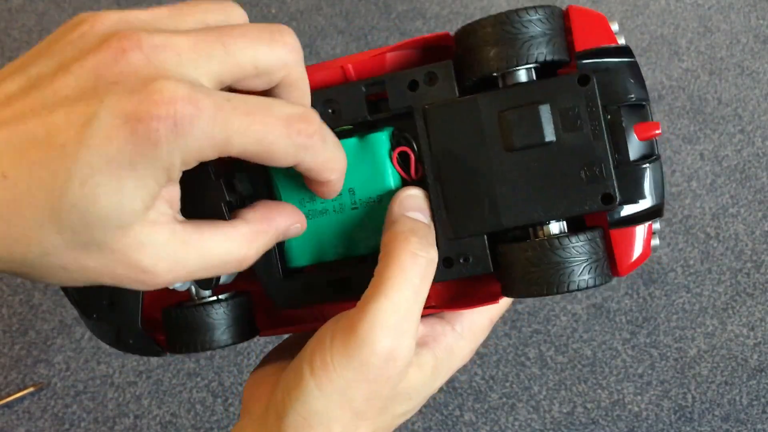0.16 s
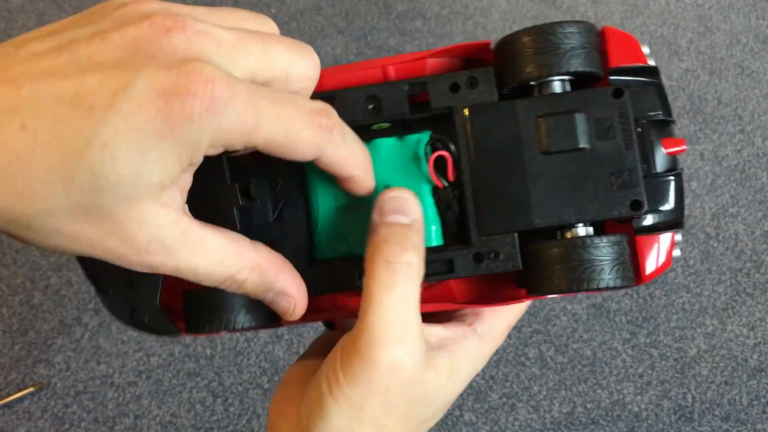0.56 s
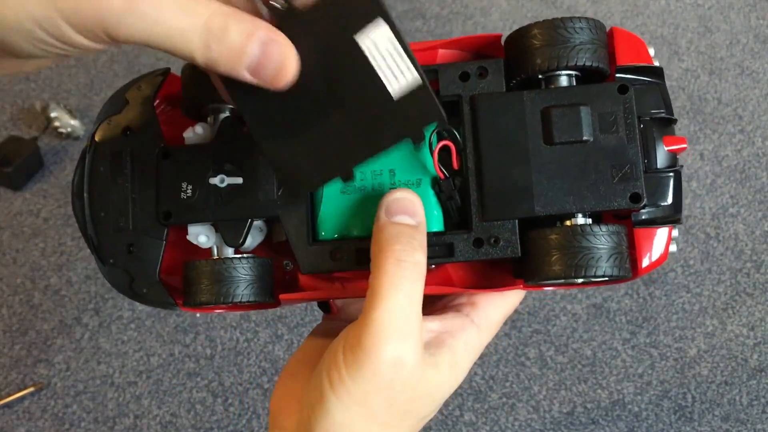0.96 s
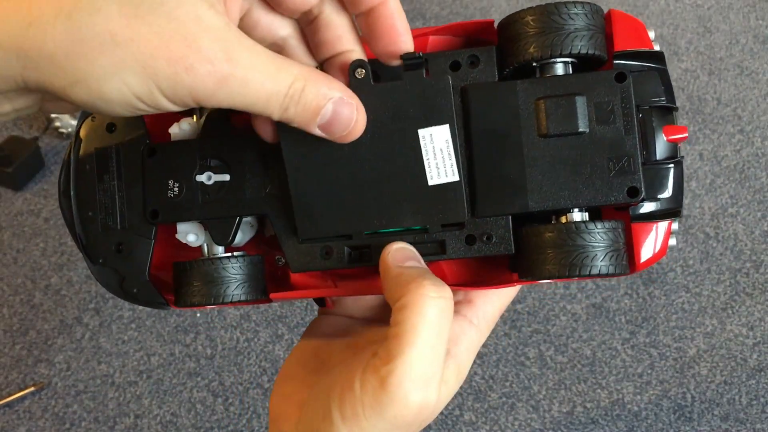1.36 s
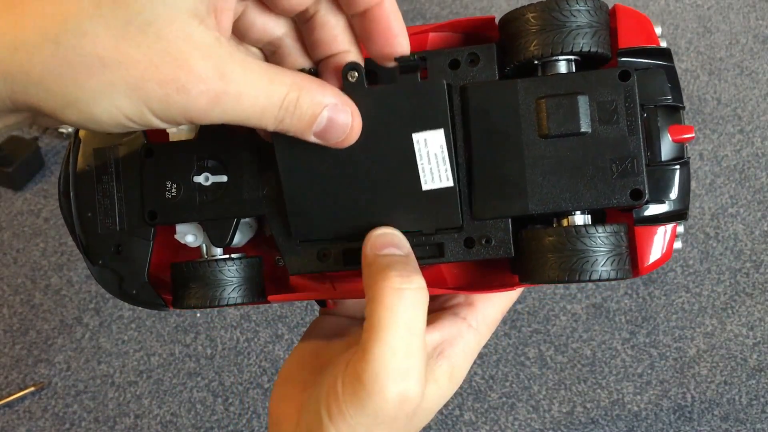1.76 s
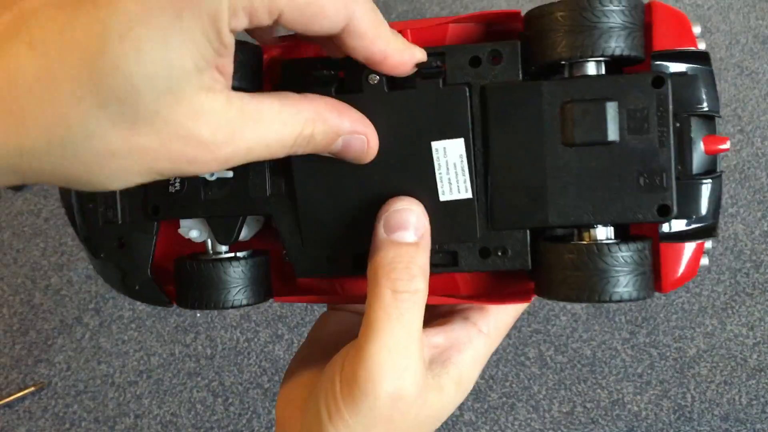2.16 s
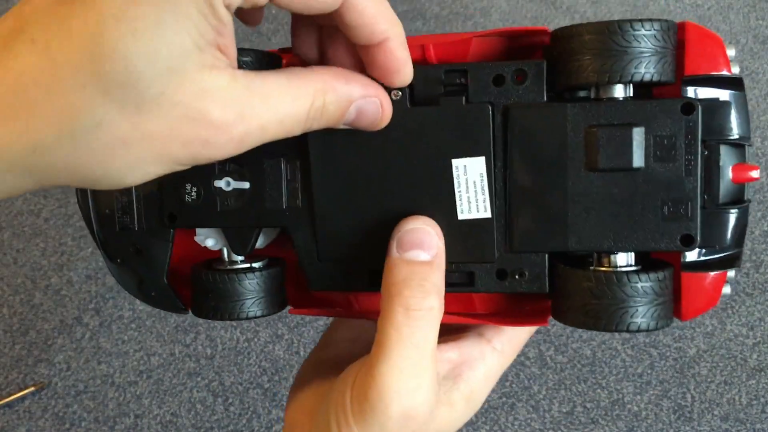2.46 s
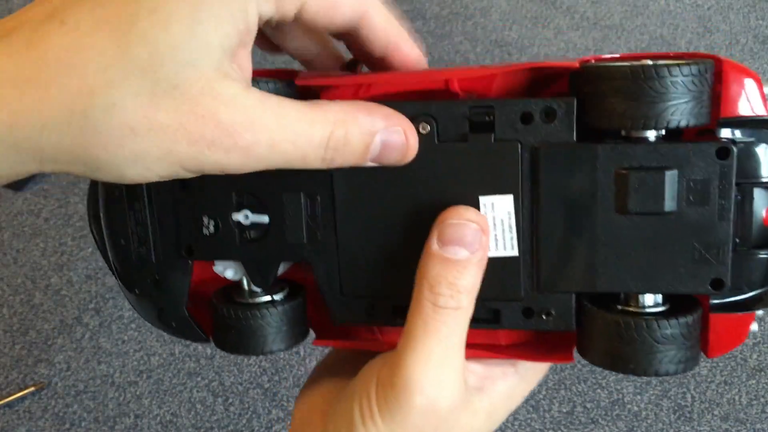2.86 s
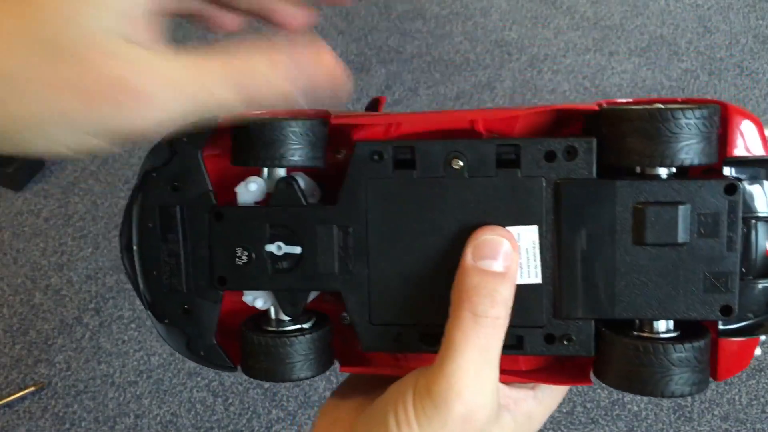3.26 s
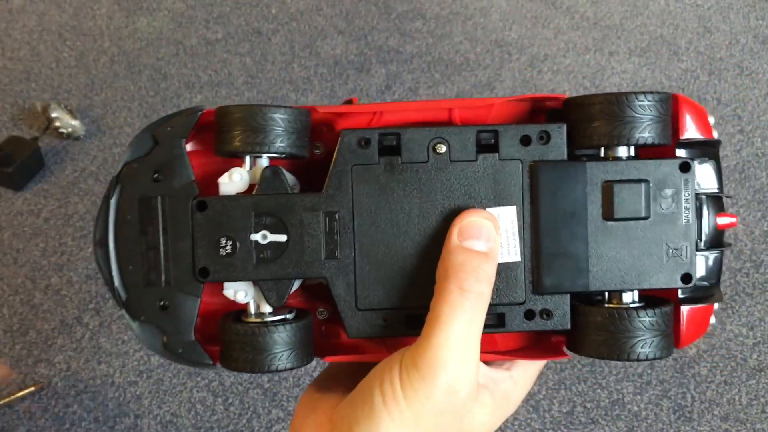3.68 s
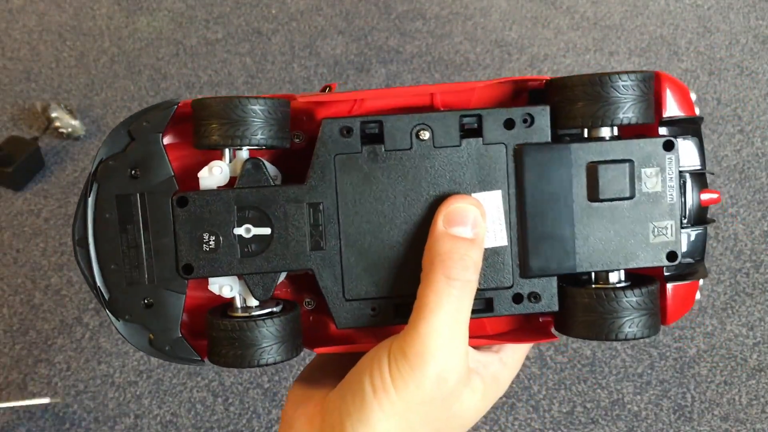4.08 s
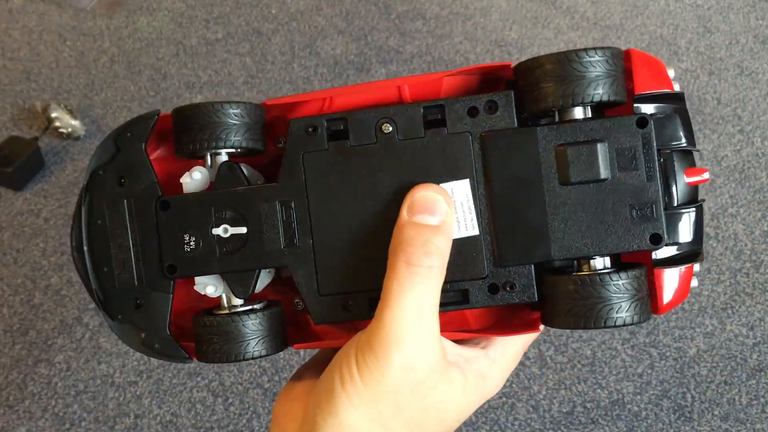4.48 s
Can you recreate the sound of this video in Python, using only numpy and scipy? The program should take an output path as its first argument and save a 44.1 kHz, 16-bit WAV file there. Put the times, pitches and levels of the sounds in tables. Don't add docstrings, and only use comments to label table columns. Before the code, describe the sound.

Close phone recording in a small carpeted room with a short, faint tail. It opens with gritty finger rubbing on plastic and light ticks; at 0.23 s a very loud, sharp snap rings the hollow toy car as the battery pack seats. Firm clacks follow at 0.37-0.57 s, then smaller ticks and knocks, with a bright hard crack near 1.08 s. Sparse contacts come at 1.3 s and 1.55-1.9 s as the cover is positioned. Rubbing returns around 2.1 s, and a quick cluster of scrapes and rattling clacks runs 2.6-2.8 s. At 3.08 s a second snap, crisp and bright, closes the cover. After that only faint brushes and tiny ticks remain, around 3.6-4.0 s and near 4.5 s. Beneath, low rumble is strongest at the start and fades, soft hiss persists, and a distant engine drone swells faintly around 1-1.8 s and 3.6-4.6 s.

```python
import sys
import numpy as np
from scipy import signal
from scipy.fft import rfft, irfft, next_fast_len
from scipy.io import wavfile
from scipy.ndimage import uniform_filter1d, map_coordinates

SR = 44100
rng = np.random.default_rng(int(sys.argv[2]) if len(sys.argv) > 2 else 0)


def digitize_waveform(pressure):
    field = np.atleast_2d(pressure).T
    bounded = np.clip(field, -1, 1)
    quanta = np.round(bounded * 32767).astype(np.int16)
    wavfile.write(sys.argv[1], SR, quanta)


def how_loud(loudness_db):
    steps = np.asarray(loudness_db, float) / 20
    return 10 ** steps


N = 204022


def unit(x):
    return x / np.sqrt(np.mean(x ** 2) + 1e-20)


def along(points, hz):
    f, v = np.transpose(points)
    return np.interp(np.log(hz + 1), np.log(f + 1), v)


def curves(rows):
    s, *cols = np.transpose(rows)
    return [np.interp(np.arange(N) / SR, s, c) for c in cols]


def wobble(rate_hz):
    knots = rng.standard_normal(int(N * rate_hz / SR) + 4)
    return map_coordinates(knots, [np.arange(N) * rate_hz / SR])


def filtered(x, response):
    m = next_fast_len(N + SR // 2)
    return irfft(rfft(x, m) * response(np.fft.rfftfreq(m, 1 / SR)), m)[:N]


def rung(force, modes):
    def response(f):
        total = 0
        for k, (centre_hz, width_hz, db) in enumerate(modes):
            damping = 1j * f * width_hz
            total = total + (-1) ** k * how_loud(db) * damping / (centre_hz ** 2 - f * f + damping)
        return total

    power = np.mean(np.abs(response(np.linspace(0, SR / 2, 4096))) ** 2)
    return filtered(force, response) / np.sqrt(power)


def body(force):
    # centre in Hz, width in Hz, level in dB.
    box_modes = [(221, 630, -18.5), (348, 140, -4.5), (611, 19, -5), (701.5, 33, -3), (840, 97, 2.5),
                 (1024, 140, 3.5), (1360, 270, -4.5)]
    panel_modes = [(1600, 230, -3.5), (2110, 340, -1), (2560, 450, 0), (3345, 450, -4), (3590, 130, 0),
                   (4400, 1100, -7)]
    edge_modes = [(5497, 680, -3), (6800, 970, -3), (7440, 800, -2), (9330, 1500, -2.5), (10010, 780, -1),
                  (10960, 1400, -4.5), (12495, 1600, -4), (14830, 710, -5)]
    box, panels, edges = (rung(f[:N], modes) for f, modes in zip(force, (box_modes, panel_modes, edge_modes)))
    return filtered(box + panels, lambda hz: 1 / (1 + 1.3j * hz / 5600 - (hz / 5600) ** 2)) + edges


def air():
    # frequency in Hz, density in dB per Hz.
    hiss_db = [(40, -17.5), (100, -16), (140, -18.5), (240, -29), (330, -32.5), (470, -52), (1100, -55),
               (4300, -55), (8000, -54.5), (12500, -50), (15600, -51), (16000, -79.5)]
    lift_db = [(400, -5), (2000, -0.5), (6000, -2), (12000, -3), (15700, -4), (16100, -23.5)]
    # start in seconds, end in seconds.
    lift_s = [
        (0.0, 0.2),
        (0.232, 0.642),
        (3.078, 3.488),
    ]
    t = np.arange(N) / SR
    hiss = filtered(rng.standard_normal(N), lambda hz: how_loud(along(hiss_db, hz)))
    above_rumble = filtered(hiss, lambda hz: hz > 400)
    extra = unit(filtered(rng.standard_normal(N), lambda hz: how_loud(along(lift_db, hz)) * (hz > 300)))
    is_open = sum((t > start) & (t < end) for start, end in lift_s)
    return how_loud(-79.5 + 0.34 * wobble(4)) * hiss / np.std(above_rumble) + how_loud(-69.5) * extra * is_open


def note(hz, db, wander_hz, rough_db):
    level = how_loud(db + rough_db * wobble(3.9))
    cycles = np.cumsum(hz + wander_hz * wobble(21.0)) / SR
    return level * np.sqrt(2) * np.sin(2 * np.pi * cycles)


def engine():
    # time in seconds, pitch in Hz, level in dB.
    swells = [
        [(0.86, 73.1, -69), (0.99, 73.44, -54), (1.192, 75.17, -58.5), (1.376, 78.36, -53.5), (1.47, 76.1, -65),
         (1.65, 73.9, -67), (1.75, 78.83, -60), (1.95, 79, -71)],
        [(3.5, 80, -64.5), (3.65, 75.7, -60.5), (4.078, 79.36, -51), (4.228, 74.86, -50.5),
         (4.382, 80.2, -62.5), (4.53, 73.44, -51), (4.626, 69.4, -51)],
    ]
    upper_note = [(0.0, 160, -79.5), (0.26, 149.6, -70), (0.5, 157.7, -65), (0.73, 159.9, -78),
                  (0.85, 153.9, -61.5), (1.0, 145.9, -66.5), (1.13, 150.3, -63.5), (1.3, 140.8, -73),
                  (1.6, 139.8, -71), (1.78, 140.7, -63), (2.1, 143, -68), (2.5, 140, -71.5),
                  (2.85, 139.7, -68.5), (3.15, 155, -75.5), (3.35, 170.4, -66), (3.62, 165.2, -70.5),
                  (3.85, 151.1, -70.5), (4.63, 160, -86)]
    rows = []
    for swell in swells:
        (first_s, first_hz, _), (last_s, last_hz, _) = swell[0], swell[-1]
        rows += [(first_s - .08, first_hz, -100), *swell, (last_s + 0.058, last_hz, -100)]
    hold_s, fade_s = 0.046, 0.87
    rumble_db = -68.5 + 16.5 * np.clip(1 - (np.arange(N) / SR - hold_s) / fade_s, 0, 1)
    rumble = unit(rung(rng.standard_normal(N), [(36, 59, 6.0), (65.0, 5.3, -7.5)]))
    drone = note(*curves(rows), wander_hz=0.56, rough_db=-0.6)
    upper = note(*curves(upper_note), wander_hz=4.2, rough_db=0.5)
    return drone + upper + how_loud(rumble_db) * rumble


def rubbing():
    # time in seconds, level in dB.
    grip = [(0.0, -56), (0.19, -59.5), (0.41, -57), (0.55, -82), (0.7, -71), (0.94, -81), (1.35, -73.5),
            (1.5, -86), (1.83, -100.5), (2.06, -63), (2.43, -75.5), (3.1, -66.5), (3.45, -78.5),
            (3.68, -86), (3.95, -79), (4.63, -105)]
    # start in seconds, length in seconds, panels in dB,
    # compartment in dB re panels, rubbed spot in Hz.
    scrapes = [(0.0, 0.057, -62.5, -5, 2910), (0.19, 0.12, -50, -4.5, 3260),
               (0.364, 0.18, -65.5, -2.5, 2150), (0.543, 0.098, -62, -1.5, 3210),
               (0.681, 0.029, -63, -3, 2430), (0.888, 0.0296, -65.5, -14, 3000),
               (1.03, 0.059, -71.5, 0, 2400), (1.129, 0.052, -69.5, -7, 1180),
               (1.327, 0.047, -72, 8.5, 1270), (1.464, 0.08, -67, -3.5, 1860),
               (1.538, 0.0395, -64.5, 6.5, 1510), (1.838, 0.056, -72.5, 12.5, 2120),
               (2.099, 0.02, -71, 2, 3230), (2.11, 0.14, -57, -4, 2266), (2.304, 0.2, -75, -0.5, 1470),
               (2.349, 0.027, -61.5, -15, 1530), (2.24, 0.45, -87.5, 10, 2570),
               (2.607, 0.045, -53, -0.5, 2410), (2.68, 0.0324, -47.5, 2, 1360),
               (2.797, 0.013, -44.5, -0.5, 1000), (2.941, 0.054, -75, 7.5, 2305),
               (3.764, 0.0356, -68, -9, 1392), (3.793, 0.063, -80, -2.5, 2600),
               (3.866, 0.178, -78, -0.5, 1097), (3.937, 0.141, -81, -6, 1780), (2.38, 0.26, -87, -13, 4000),
               (1.038, 0.059, -75, -12, 2210), (2.287, 0.15, -80, -6, 1560),
               (0.508, 0.018, -60.5, -12, 4000), (0.684, 0.064, -73, -4, 2380),
               (2.807, 0.012, -58, -4, 1000)]
    t = np.arange(N) / SR
    press = how_loud(curves(grip)[0] + np.array([[-7.5], [-7], [-25]]))
    spots, flutter = np.zeros(N), wobble(260)
    for s, length_s, panel_db, box_db, hz in scrapes:
        u = np.clip((t - s) / length_s, 0, 1)
        stroke = np.clip(8.2 * u, 0, 1) * np.clip(3 * (1 - u), 0, 1)
        press += how_loud(panel_db + np.array([[box_db], [0], [-8]])) * stroke
        spots += how_loud(panel_db - 1.0) * stroke * flutter * np.sin(2 * np.pi * hz * t)
    own_clumps = np.array([wobble(50), wobble(50), wobble(90)])
    clumps = how_loud(wobble(70) + 3.1 * wobble(220) + 1.5 * own_clumps)
    spikes = how_loud(5 * rng.standard_normal(N))
    grit = unit(clumps * spikes * rng.standard_normal((3, N)))
    power = uniform_filter1d(uniform_filter1d(grit ** 2, size=1300), size=1300)
    grit /= np.sqrt(np.abs(power) + .02)
    grit[1] = unit(filtered(grit[1], lambda hz: 1 / (1 + 1j * hz / 2800) ** 2))
    return body(press * grit * how_loud([[0], [-6], [0]])) + spots * unit(clumps[1])


def evened(bursts, depth):
    z = rfft(bursts)
    power = np.abs(z) ** 2
    flat = z * (power / power.mean(-1, keepdims=True) + 0.6) ** (-depth / 2)
    return irfft(flat, bursts.shape[-1])


def contact_rows():
    # start in seconds, panel peak in dB,
    # edge crack in dB re panel, struck spot in Hz.
    ticks = [(0.0092, -38, -19, 2720), (0.0294, -42.5, -2.5, 1980), (0.456, -37, -21, 3200),
             (0.512, -39, -15, 3600), (0.683, -37, -3.5, 4060), (0.7243, -42, -25, 2390),
             (0.807, -48, -10.5, 3280), (0.8924, -45.5, 0, 2290), (0.917, -45, 0, 4500),
             (0.991, -44.5, -22, 2340), (1.014, -43, -4, 4390), (1.0225, -50, 4, 4450),
             (1.037, -42.5, -5, 2240), (1.0717, -33, -2, 2420), (1.0814, -37.5, -0.5, 4400),
             (1.151, -43.5, -16, 2060), (1.167, -49, -14, 2100), (1.205, -42.5, -13, 4070),
             (1.236, -46, -32, 2060), (1.26, -42.5, -5.5, 2480), (1.5751, -29.5, -13.5, 2510),
             (2.21, -38.5, -7, 2290), (2.359, -44, -3, 5100), (2.471, -59.5, 5.5, 2840),
             (2.955, -38, -29, 2140), (3.6265, -50.5, -22.5, 2320), (3.6867, -47, -28, 3280),
             (3.709, -50, -5.5, 4400), (4.0057, -44.5, -17, 2110), (4.597, -54, -34, 2120),
             (0.022, -43, -15, 2880), (0.389, -49, -9.5, 3000), (0.442, -44, -13, 3000),
             (0.574, -32.5, -8.5, 4170), (0.6876, -40.5, -1.5, 8800), (1.286, -70, -17, 2500),
             (1.618, -47, -21, 1800), (1.874, -52, -11, 910), (1.912, -55.5, -14, 2380),
             (2.197, -48, -6, 3300), (2.261, -55, -16, 2300), (2.281, -59.5, -17, 1370),
             (4.078, -57.5, -20, 2000), (4.456, -61, -19, 3200), (4.469, -56, -20.5, 4200)]
    # start in seconds, panel peak in dB,
    # compartment in dB re panel, edge crack in dB re panel, struck spot in Hz.
    blows = [(0.0944, -36, 3.5, -8, 3100), (0.2082, -36.5, -13, -5.5, 3140), (0.2322, -11.5, -10, -8, 3590),
             (0.3674, -32, -4.5, -8.5, 3660), (0.415, -29.5, 0.5, -6.5, 3740),
             (0.538, -35.5, 2.5, -5, 1870), (0.545, -23.5, -8, -5.5, 3810), (1.3007, -33.5, 2, -8.5, 1970),
             (1.311, -42.5, 5, 1.5, 1780), (1.744, -38.5, 6.5, -21, 1980), (1.7555, -38, -2, -5, 3100),
             (2.612, -36, -3, -9.5, 1630), (2.639, -33, -6, -24, 2310), (2.6511, -29.5, 0, -1, 3780),
             (2.6856, -29.5, 0, -21, 2110), (2.6932, -26, -3, -10.5, 2110), (2.7007, -36, 3, -3, 2430),
             (2.7611, -52, -3, 3, 2800), (2.7657, -30, -4, -6, 2860), (2.7975, -43, 2, -8, 1680),
             (3.0545, -50, 0, -3, 2100), (3.065, -35.5, 0, -11, 1960), (3.0745, -23, 1.5, -6, 2970),
             (3.077, -19, -10, 8.5, 4400)]
    # start in seconds, panel peak in dB,
    # compartment in dB re panel, struck spot in Hz.
    knocks = [(0.19, -41.5, 4, 2930), (0.1954, -44.5, 19.5, 1770), (0.406, -34, -5, 3100),
              (0.482, -40.5, -4, 1600), (0.5716, -42, -6, 1550), (0.5963, -43.5, 9, 1520),
              (0.651, -46, 3.5, 1530), (0.849, -41.5, 1.5, 4000), (0.973, -58, 12, 1574),
              (1.473, -43.5, -1.5, 1960), (1.5429, -52, 5, 2140), (1.5584, -35.5, -4, 1680),
              (1.6058, -42, 0.5, 1720), (1.719, -44, -3, 2560), (1.839, -41.5, 8.5, 1515),
              (1.8547, -41.5, -10, 2020), (1.863, -45, -3, 2020), (1.961, -39.5, -4, 2670),
              (1.965, -42.5, 5, 1910), (2.0178, -49.5, 3, 2700), (2.0435, -46.5, 12, 1557),
              (2.119, -39, 0, 2100), (2.6, -64, 15, 1510), (2.7213, -38, 6, 2220), (2.8141, -47, -5, 2520),
              (2.924, -62, 18, 1560), (2.9456, -45.5, 0, 2110), (2.9809, -44.5, 3.5, 2060),
              (3.257, -44, 9, 1600), (3.7663, -51, -7.5, 3215)]
    # start in seconds, peak in dB, struck spot in Hz.
    flicks = [(0.2321, -8.5, 13600), (0.896, -32, 14300), (1.083, -16, 9000), (1.152, -44, 14500),
              (2.461, -44.5, 6840), (4.461, -53, 7100), (3.776, -47, 6500), (0.5183, -34, 8100),
              (0.6726, -51, 3000), (0.7094, -64, 9400), (0.768, -43, 8880), (1.005, -46, 2880),
              (1.362, -45, 1497), (2.0747, -60, 1990), (2.3894, -44, 2390), (2.873, -47, 7940),
              (2.93, -51, 12500), (2.961, -39, 11900), (2.977, -46, 6025), (2.992, -45, 5900),
              (3.029, -46.5, 10950), (4.0946, -51.5, 2140), (4.4718, -46, 6420), (4.4707, -61, 2680)]
    # start in seconds, peak in dB,
    # pitch in Hz, t60 in ms.
    rings = [(0.2325, -24.5, 766, 25), (0.235, -39, 360, 130), (0.2328, -22.5, 1008, 20),
             (0.234, -20, 2090, 9.6), (0.2335, -31, 5120, 19), (0.2334, -26.5, 6760, 6.9),
             (0.2335, -14.5, 3030, 17.5), (0.4158, -35, 937, 12), (0.481, -54, 1600, 42),
             (0.544, -38, 7000, 7), (0.5458, -41, 11400, 7), (0.569, -46, 917, 32),
             (0.852, -48.5, 1015, 31), (1.119, -63, 1170, 98), (1.0865, -35.5, 9320, 6.8),
             (1.301, -43, 1313, 24), (1.301, -49.5, 589, 59), (1.345, -60.5, 376, 117),
             (1.968, -44, 870, 25), (2.121, -51.5, 846, 38), (2.133, -55, 2270, 25), (2.138, -44, 1054, 38),
             (2.168, -45.5, 960, 46), (2.172, -47, 2170, 22), (2.193, -49.5, 930, 34),
             (2.215, -48.5, 1437, 33), (2.614, -46, 607, 81), (2.651, -37.5, 760, 6.8),
             (2.691, -35, 1360, 113), (2.766, -42, 820, 23), (2.799, -42, 955, 23), (3.0772, -23, 842, 19),
             (3.0785, -23.5, 1074, 17), (3.0771, -29, 1700, 28), (3.078, -32, 2056, 37),
             (3.079, -35.5, 4400, 17), (3.078, -29.5, 6360, 18), (3.0789, -32.5, 6900, 15),
             (3.078, -30, 9700, 12), (3.0777, -11.5, 12170, 6.2), (3.079, -19.5, 15160, 13),
             (3.611, -68, 1002, 31), (3.7088, -58, 4400, 12), (3.709, -59, 1535, 34.6),
             (3.731, -66, 948, 31), (3.751, -65, 2220, 17), (3.766, -58.5, 3290, 15.6),
             (3.766, -63, 1008, 20), (3.796, -67, 3400, 51), (3.815, -68, 1480, 63)]
    struck = [(s, db, box_db, 0, edge_db, 3.7, hz) for s, db, box_db, edge_db, hz in blows]
    struck += [(s, db, box_db, 0, -14, 2.5, hz) for s, db, box_db, hz in knocks]
    struck += [(s, db, -20.5, 0, edge_db, 1.4, hz) for s, db, edge_db, hz in ticks]
    struck += [(s, db, -33, -16.5, -16.5, 2.4, hz) for s, db, hz in flicks]
    rows = []
    for row in struck:
        panel_db, hz = row[1], row[6]
        spot_db = panel_db - 12.0 + 10 * np.log10(2500 / hz)
        rows.append((*row, spot_db, min(20 / hz, .03)))
    return rows + [(s, -200, 0, 0, 0, 1.5, hz, db, ms / 1000) for s, db, hz, ms in rings]


def contacts():
    rows = contact_rows()
    force, spots, t = np.zeros((3, N + SR)), np.zeros(N + SR), np.arange(SR // 12) / SR
    chance = rng.standard_normal((len(rows), 4, len(t)))
    for (s, db, box_db, panel_db, edge_db, ms, hz, spot_db, t60_s), draw in zip(rows, chance):
        start = round(s * SR)
        life_s = ms / 1000 * np.array([[1.1], [.95], [.6]])
        rise = 1 - np.exp(-t / (0.026 * ms * life_s))
        shape = rise * np.exp(-(t / life_s) ** 0.35)
        fade = np.exp(-(t / (2.9 * life_s)) ** 2)
        impacts = evened(shape * how_loud(6.5 * draw[3]) * draw[:3], depth=0.091) * fade
        wanted = np.linalg.norm(shape * fade, axis=1, keepdims=True)
        impacts *= wanted / np.linalg.norm(impacts, axis=1, keepdims=True)
        shares = how_loud(db + np.array([[box_db - 8.0], [panel_db - 8.5], [edge_db - 1.0]]))
        force[:, start:start + len(t)] += shares * impacts
        ring = how_loud(-60 * t / max(t60_s, .002)) * (1 - np.exp(-t * hz)) * np.sin(2 * np.pi * hz * t)
        rang = signal.fftconvolve(impacts[1], ring)[:len(t)]
        spots[start:start + len(t)] += how_loud(spot_db) * rang / np.abs(rang).max()
    return body(force) + spots[:N]


def thumps():
    # start in seconds, peak in dB, pitch in Hz, length in ms.
    pushes = [(0.232, -29.5, 153, 4.7), (0.238, -37, 250, 7.5), (0.299, -60.5, 151, 10),
              (0.55, -56.5, 142, 28), (0.895, -40, 152, 4.2), (1.3, -44.5, 369, 4.9),
              (1.355, -57.5, 139, 19), (2.342, -41.5, 149.4, 5.2), (2.601, -44.5, 167, 2.2),
              (2.656, -44, 222, 4.6), (2.689, -46.5, 194, 15), (2.799, -50, 143, 13),
              (3.074, -42.5, 135, 8.7), (3.868, -47, 122.5, 10.2)]
    out, t = np.zeros(N + SR), np.arange(SR // 8) / SR
    for s, db, hz, ms in pushes:
        u = t / (ms / 1000)
        out[round(s * SR):][:len(t)] += how_loud(db + 11.0) * u * np.exp(-1.8 * u) * np.sin(2 * np.pi * hz * t)
    return out[:N]


def pricks():
    # start in seconds, peak in dB, pitch in Hz, cycles until silent.
    corners = [(0.2332, -16.5, 8900, 5), (0.7235, -49.5, 4400, 25), (0.899, -43, 4420, 23),
               (1.0722, -31, 14900, 19), (1.0855, -33.5, 4610, 22), (1.0868, -32, 11500, 33),
               (1.096, -56, 6000, 36), (1.26, -44, 9020, 13), (2.612, -39.5, 3100, 24),
               (2.613, -43, 1650, 18), (2.6933, -31, 5000, 4), (2.686, -33, 2110, 45),
               (2.7025, -27, 11600, 28), (2.7662, -29.5, 3040, 14), (2.767, -41, 8500, 28),
               (2.799, -40.5, 657, 46), (2.803, -36, 11900, 29), (2.805, -44, 3100, 27),
               (3.0555, -52, 12200, 25), (3.0665, -52.5, 12300, 20), (3.628, -60, 2300, 16),
               (3.6862, -41.5, 3205, 7.2), (3.7093, -45.5, 4296, 7), (3.7672, -50, 7966, 9),
               (4.006, -55, 2297, 16), (4.598, -54.5, 2315, 16), (2.12, -40, 10860, 8),
               (2.214, -46, 9100, 30), (2.356, -48.5, 5200, 40), (4.472, -60, 3900, 12),
               (0.3687, -48, 850, 20), (0.2345, -29, 1700, 26), (3.133, -39, 900, 14), (2.652, -39, 398, 6),
               (2.692, -38, 700, 15), (1.166, -56, 3500, 30), (3.0786, -19, 2760, 9),
               (3.0801, -21, 4330, 9.9), (3.0822, -16, 3150, 13), (0.2333, -13, 15000, 25),
               (0.237, -22, 2600, 10), (1.0722, -38, 9000, 14), (2.601, -52, 1000, 3),
               (0.552, -42, 9000, 15), (1.3015, -42, 10000, 21), (2.653, -41, 5600, 25),
               (0.85, -46, 5470, 9.6)]
    out, t = np.zeros(N + SR), np.arange(SR // 12) / SR
    for s, db, hz, cycles in corners:
        out[round(s * SR):][:len(t)] += how_loud(db - 60 * t * hz / cycles) * np.sin(2 * np.pi * hz * t)
    return out[:N]


def room(x):
    # frequency in Hz, t60 in seconds.
    t60_s = [(300, 0.44), (1000, 0.26), (3000, 0.29), (7000, 0.28), (14000, 0.13)]
    # centre in Hz, width in Hz, level in dB.
    valley = (530, 100, -8.5)
    grid = dict(nperseg=256, noverlap=192)
    hz, _, z = signal.stft(x, SR, **grid)
    power = uniform_filter1d(np.abs(z) ** 2, size=3, axis=0)
    lag_s = np.arange(400) * 64 / SR
    decay = how_loud(-120 * lag_s / along(t60_s, hz)[:, None]) * (lag_s > .006)
    spread = signal.fftconvolve(power, decay / decay.mean(0).sum(), axes=1)[:, :z.shape[1]]
    patches = uniform_filter1d(rng.standard_normal(z.shape), size=2, axis=0)
    patches = unit(uniform_filter1d(patches, size=9, axis=1))
    spread *= how_loud(5 * patches - 1.5)
    fresh = signal.stft(rng.standard_normal(N), SR, **grid)[2]
    tail = signal.istft(fresh / np.abs(fresh).std() * np.sqrt(np.abs(spread)), SR, **grid)[1][:N]
    centre_hz, width_hz, db = valley
    return filtered(tail, lambda f: how_loud(db * np.exp(-((f - centre_hz) / width_hz) ** 2)))


def scene():
    car = rubbing() + contacts() + thumps() + pricks()
    return (air() + engine() + car + how_loud(-19.5) * room(car))[None]


def roll_off(x):
    return signal.sosfilt(signal.butter(12, 16800, fs=SR, output="sos"), x)


def record(dry):
    # centre in Hz, width in Hz, level in dB.
    notches = [
        (487, 26, -3),
        (5240, 250, -2.5),
        (10700, 380, -1.5),
    ]

    def colour(f):
        db = sum(depth_db / (1 + ((f - hz) / width_hz) ** 2) for hz, width_hz, depth_db in notches)
        return how_loud(db - 18 * np.clip((f - 15800) / 250, 0, 1))

    mix = filtered(dry[0], colour)[None]
    return roll_off(mix)


dry = scene()
out = record(dry)
digitize_waveform(out)
```